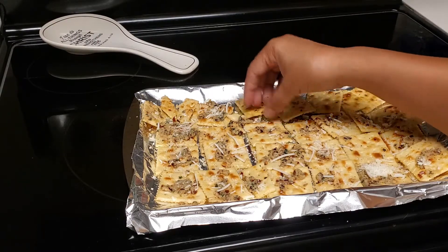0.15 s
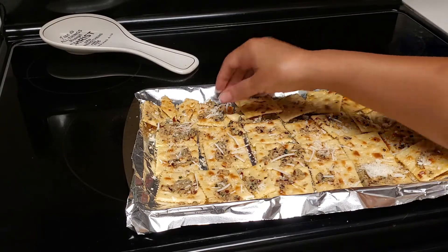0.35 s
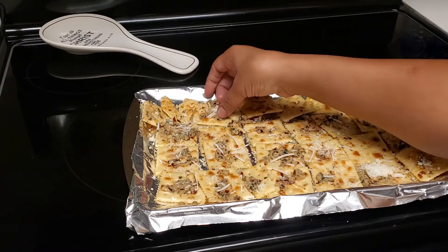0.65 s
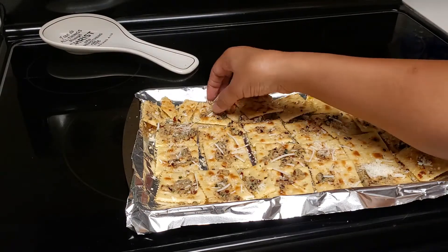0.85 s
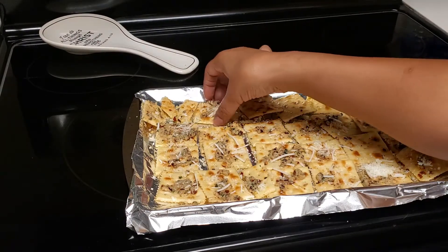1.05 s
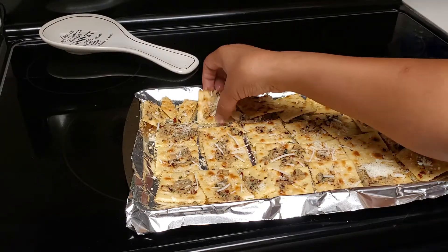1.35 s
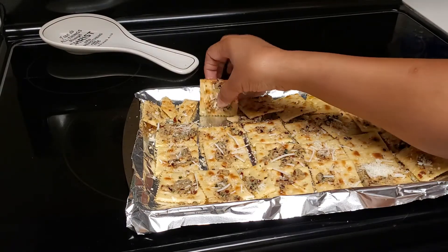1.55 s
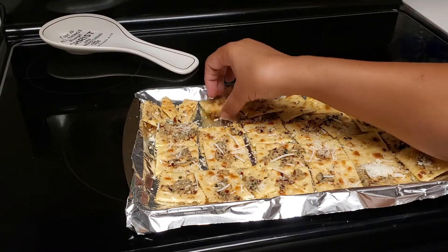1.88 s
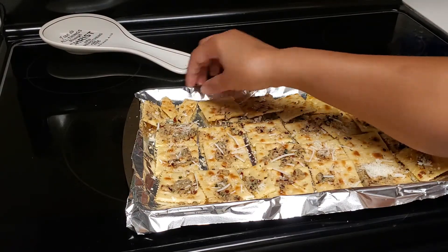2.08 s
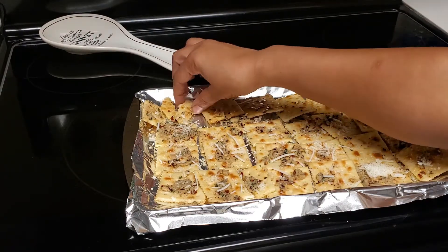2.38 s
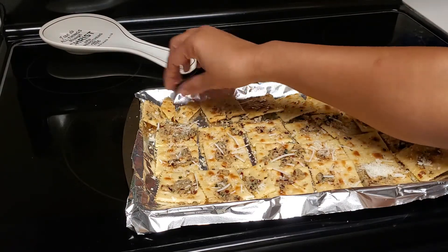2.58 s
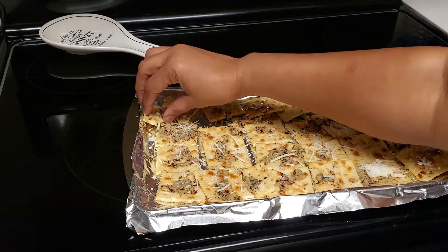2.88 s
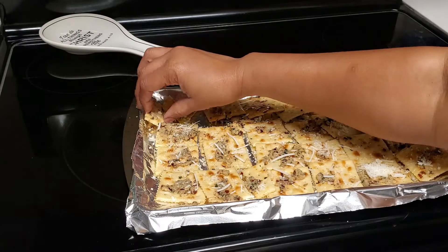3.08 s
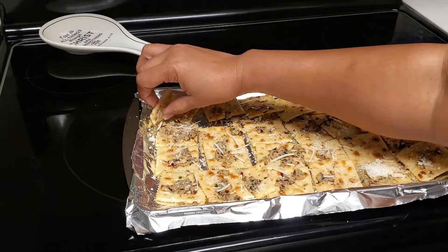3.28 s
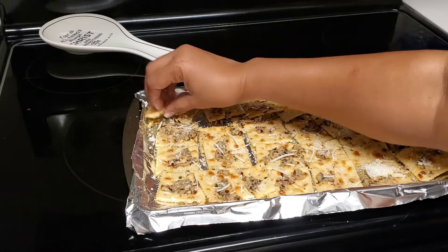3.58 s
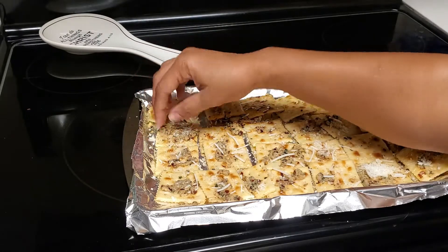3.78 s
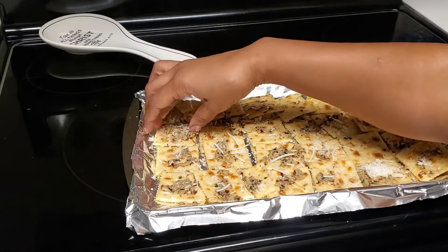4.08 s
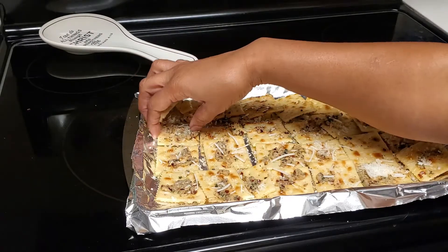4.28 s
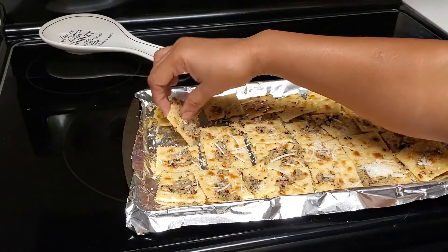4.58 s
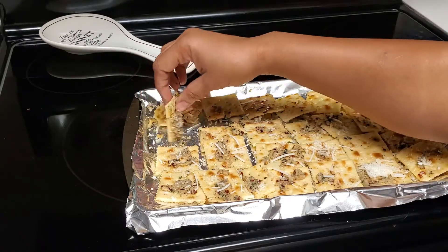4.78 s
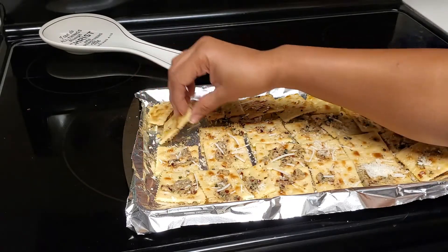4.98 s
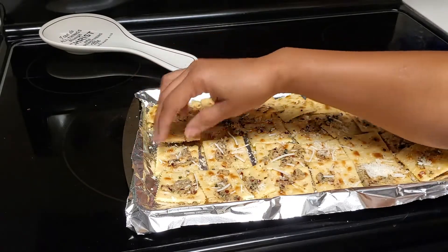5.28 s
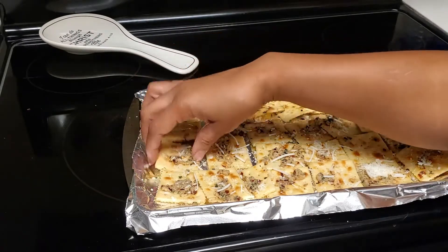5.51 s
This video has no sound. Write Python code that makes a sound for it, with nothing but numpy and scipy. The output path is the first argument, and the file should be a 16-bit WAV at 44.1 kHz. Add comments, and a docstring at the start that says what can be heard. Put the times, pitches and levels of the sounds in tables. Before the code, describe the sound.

Baked crackers are turned over on crinkling foil, with brittle snaps, light scrapes and a low, steady kitchen hum.

```python
"""An appliance hums from the start, and at once a baked cracker clicks on a foil-covered baking sheet.
A hand picks up, flips and sets down crackers: brittle edges snap and crumble, and the foil crinkles.
The sheet thuds softly as it is pressed onto the stove top, and dragged crackers scrape over the foil.
Snaps and scrapes are made of tiny cracks, and a small, hard kitchen answers them with a short echo."""
import sys
import numpy as np
from scipy import signal
from scipy.fft import rfft, irfft, next_fast_len
from scipy.io import wavfile
from scipy.ndimage import uniform_filter1d, map_coordinates

SR = 44100
rng = np.random.default_rng(int(sys.argv[2]) if len(sys.argv) > 2 else 0)


def to_wav(sig):
    """Store sig (one row per channel, or 1-D mono) as 16-bit WAV at the path in sys.argv[1].

    Samples outside -1..1 are clipped; the rate is SR.
    """
    pcm = np.clip(np.atleast_2d(sig), -1, 1) * 32767
    pcm = np.round(pcm).astype(np.int16)
    wavfile.write(sys.argv[1], SR, pcm.T)  # frames by channels


N = 249165

# how alike the background is on the left and right: f/Hz, likeness (1 = the same, 0 = unrelated)
LIKENESS = [(100, 0.94), (200, 0.93), (300, 0.97), (500, 0.24), (1000, 0), (4000, 0)]


def amp(db):
    """Turn decibels into a number to multiply by."""
    return 10 ** (np.asarray(db) / 20)


def unit(x):
    """Scale to an average strength (rms) of 1."""
    return x / np.sqrt(np.mean(x ** 2) + 1e-20)


def burst(x):
    """Scale to an average energy of 1 per channel."""
    return unit(x) / np.sqrt(x.shape[-1])


def along(points, hz):
    """Read between the rows of a (frequency, value) table, with octaves evenly spaced."""
    freqs, values = np.transpose(points)
    return np.interp(np.log(hz + 1), np.log(freqs + 1), values)


def wobble(rate):
    """A smooth curve through `rate` random values a second."""
    return map_coordinates(rng.standard_normal(int(N * rate / SR) + 4), [np.arange(N) * rate / SR])


def add(track, start_s, x):
    """Mix x into the track at the given time."""
    start = max(round(start_s * SR), 0)
    part = track[:, start:start + x.shape[1]]
    part += x[:, :part.shape[1]]


def room_noise(spectrum):
    """Steady noise that fills the room: the bass is alike on both sides, higher sounds are not."""
    size = next_fast_len(N)
    hz = np.fft.rfftfreq(size, 1 / SR)
    apart = np.arccos(along(LIKENESS, hz)) / 2
    gain = amp(along(spectrum, hz)) * [np.cos(apart), np.sin(apart)]
    mid, side = irfft(rfft(rng.standard_normal((2, N)), size) * gain, size)[:, :N]
    return unit(np.array([mid + side, mid - side]))


def appliance(air_db=-57.5, hiss_db=-78, waver_db=2, drift_rad=1.01):
    """A motor and the mains hum in wavering tones over a rush of moving air and a faint hiss."""
    # motor and mains tones: f/Hz, wavering rate/Hz, level/dB
    hum_tones = [(54.9, 0.54, -70), (60.1, 0.28, -72), (83.9, 3, -76), (119.6, 3, -72), (153.8, 8, -70),
                 (214.2, 2.8, -62), (235.8, 12, -64), (335.4, 9, -69.5), (422.2, 5, -70.5),
                 (566.4, 12, -70), (630, 8, -73), (2840, 89, -83.5)]
    # air moved by the appliance: f/Hz, relative level/dB
    air_colour = [(22, -29), (40, -8), (70, -3), (130, -6.5), (190, -2.5), (260, -1), (380, -3.5),
                  (480, -6), (620, -8), (800, -9), (1100, -20.5), (1600, -29), (2500, -50), (5000, -39)]
    # the faint hiss: f/Hz, relative level/dB
    hiss_colour = [(500, -12.5), (1200, -10), (2000, -1), (2400, -16.5), (2900, -29), (3500, -5),
                   (4400, -26), (5400, 1.5), (7000, -14), (9000, -15.5), (11000, -27.5), (16000, -17)]
    t = np.arange(N) / SR
    hum = np.zeros((2, N))
    for hz, waver_hz, db in hum_tones:
        phase = 2 * np.pi * hz * t + drift_rad * wobble(2 * waver_hz)
        apart = np.arccos(along(LIKENESS, hz)) / 2  # standing waves differ between left and right
        loudness = amp(db + waver_db * wobble(waver_hz))
        hum += loudness * np.sqrt(2) * np.sin([phase + apart, phase - apart])
    air = amp(air_db) * room_noise(air_colour)
    hiss = amp(hiss_db) * room_noise(hiss_colour)
    return hum + air + hiss


def fractures(length_s, per_second, spread_db, swell_s, count=128):
    """One spike for each tiny break, uneven in size and spacing; the run builds up and lets go."""
    times = (np.arange(count) + rng.random(count)) / per_second
    sizes = amp(spread_db * rng.standard_normal(count).clip(-2, 1.5)) * rng.choice([-1, 1], count)
    times[0] = min(times[0], length_s / 2)  # even the shortest run has one break
    sizes *= np.minimum(np.minimum(times, length_s - times) / swell_s, 1)
    within = times <= length_s
    return burst(np.bincount((times[within] * SR).astype(int), sizes[within], int(length_s * SR) + 1))


def crack(crush, click_s=0.00029, scatter_s=0.0039, grain_db=4, size=1536, lag_samples=4):
    """A brittle click that reaches the left side first, then a grainy tail; more crush draws it out."""
    t = np.arange(size) / SR
    click = burst(rng.standard_normal(size) * np.exp(-t / (click_s * crush)))
    click_pair = np.array([click, np.pad(click, (lag_samples, 0))[:size]])
    grains = amp(grain_db * unit(uniform_filter1d(rng.standard_normal(size), size=24)))
    rise_and_fall = np.exp(-t / (scatter_s * crush)) * (1 - np.exp(-t / click_s))
    scatter = burst(rng.standard_normal((2, size)) * grains * rise_and_fall)
    click_share = np.clip(0.22 / crush, 0, 0.8)
    return np.sqrt(click_share) * click_pair + np.sqrt(1 - click_share) * scatter


def kitchen_echo(build_s=0.0023):
    """The small, hard room answers with a wash of noise in which the bass lasts longest."""
    # how long the room rings: f/Hz, time to fade by 60 dB/s
    fade_times = [(300, 0.71), (1000, 0.27), (2500, 0.31), (5500, 0.28), (10000, 0.28), (15000, 0.22)]
    hz, t, bands = signal.stft(rng.standard_normal((2, SR // 2)), SR, nperseg=256)
    fade = amp(-60 * t / along(fade_times, hz)[:, None])
    tail = signal.istft(bands * fade, SR, nperseg=256)[1]
    rise = 1 - np.exp(-np.arange(tail.shape[1]) / SR / build_s)
    return burst(tail * rise)


def crack_in_room(crack_db, pan_db, crush):
    """One break as it arrives: the crack itself, thinner the smaller it is, then the echo."""
    low_cut_hz = np.clip(2400 / crush ** 2, 100, SR / 4)
    direct = burst(signal.lfilter(*signal.butter(1, low_cut_hz, "high", fs=SR), crack(crush)))
    sound = kitchen_echo()
    add(sound, 0, direct * amp([[crack_db + pan_db / 2], [crack_db - pan_db / 2]]))
    return sound


def ringing(hz, low_hz=2400, high_hz=15000, width=0.08, ring_db=6.0, count=8):
    """Each piece of cracker or patch of foil rings at a few pitches of its own."""
    centres = low_hz * (high_hz / low_hz) ** rng.random((count, 1))
    peaks = rng.uniform(0.4, 1, (count, 1)) / (1 + ((hz - centres) / (width * centres / 2)) ** 2)
    return unit(amp(ring_db * peaks.max(0)))


def cracker_tone(x, body_db, treble_db, low_cut_hz=220, size=2048):
    """Give x the tone of a cracker on foil, heavier or brighter from one touch to the next."""
    # tone of a dry cracker on foil: f/Hz, relative level/dB
    crisp_colour = [(300, -5.5), (700, -11.5), (1100, -11.5), (1600, -9.5), (2300, -6), (3100, -1),
                    (4000, -0.5), (5300, -2), (6500, -3), (7800, -6.5), (9500, -3), (12000, -7.5),
                    (15300, -3)]
    hz = np.fft.rfftfreq(size, 1 / SR)
    tilt = [(1800, body_db), (3100, 0), (5400, 0.0066), (9000, treble_db), (15500, 0.76 * treble_db)]
    low_cut = hz ** 2 / (hz ** 2 + low_cut_hz ** 2)
    gain = unit(amp(along(crisp_colour, hz))) * ringing(hz) * amp(along(tilt, hz)) * low_cut
    # build a filter that rings only after each click, never before it
    cepstrum = irfft(np.log(gain + 1e-3))
    cepstrum[1:size // 2] *= 2
    cepstrum[size // 2 + 1:] = 0
    response = irfft(np.exp(rfft(cepstrum)))
    return signal.fftconvolve(x, response[None], axes=1)


def snaps(half_clean_s=0.01, sharp_db=1, crumbly_db=-4.5, clean_crush=0.7, crumbly_crush=2.06):
    """Cracker edges chip and foil creases pop; what does not break at once crumbles around the snap."""
    # light foil ticks and heavier cracker edges: t/s, level/dB, crumbling time/s, body/dB, treble/dB
    touches = [(0.001, -7, 0.01, 1, -1.5), (0.1, -21, 0.00083, 6.5, -0.5), (0.384, -0.5, 0.027, 2, -1.5),
               (0.406, -9, .002, 6, 1.5), (0.532, -1.5, .013, 1.5, 1), (0.641, -4, 0.021, 2, -1.5),
               (0.726, -2, 0.029, 0.5, -5), (0.757, -2, 0.0032, 3, 1.5), (0.881, -6.5, 0.0036, 2.5, 0),
               (0.96, -19, 0.0012, 1, -1), (1.005, -22, .003, -14, 7), (1.123, -10.5, 0.00056, -12, -5),
               (1.133, -12, 0.013, 0.5, 0), (1.226, -14, 0.00056, 3.5, 4.5), (1.284, -5.5, .009, 2.5, 2),
               (1.582, -21.5, 0.0057, -2, -9), (1.622, -24.5, 0.0021, -2, 1.5), (1.733, -4, 0.023, 0, 0),
               (1.76, -7, 0.00054, -6, -1), (1.927, -24.5, 0.0013, -7, -5), (2.198, -7.5, 0.0079, 0.5, 2),
               (2.273, -8.5, 0.0011, 1.5, -2), (2.285, -16, 0.0021, 4.5, 5.5),
               (2.559, -17.5, .003, 0, -2.5), (2.831, -23.5, 0.0036, 4, 0.5),
               (2.888, -19.5, 0.037, 11.5, 5), (3.192, -16, 0.028, 8, 3), (3.233, -12.5, 0.018, 8.5, -2),
               (3.594, -10.5, .034, 6.5, 2), (3.634, -13.5, 0.011, 5.5, -5), (3.979, -33.5, 0.0063, 2, 5.5),
               (4.079, -31, .012, -15, 11), (4.266, -21.5, 0.00028, 2, 10.5), (4.533, -14.5, 0.01, -4, -9),
               (4.549, -8, 0.0044, 0.5, 3.5), (4.767, -35, 0.0037, 10, -7), (5.088, -25, 0.0021, 16, -6.5),
               (5.357, -23.5, .008, 8.5, -4), (5.382, -18, 0.0014, 7.5, 0.5), (5.419, -21, 0.0021, -1, 7.5),
               (5.452, -18.5, 0.0079, 5, 1.5), (5.593, -20, 0.0061, 5, -1)]
    out = np.zeros((2, N))
    for start_s, db, crumble_s, body_db, treble_db in touches:
        clean = 1 / (1 + crumble_s / half_clean_s)  # the main snap's share of the energy
        crush = crumbly_crush + clean * (clean_crush - crumbly_crush)
        # clean snaps stand out from the echo, and bright ticks beam straight at the listener
        crack_db = crumbly_db + clean * (sharp_db - crumbly_db) + 0.2 * treble_db
        # left minus right: bright ticks lie further right, and all drift right as the hand moves
        pan_db = 3 - 0.27 * treble_db - start_s
        crumbs = np.sqrt(1 - clean) * fractures(crumble_s, per_second=700, spread_db=5.5, swell_s=0.0011)
        sound = signal.fftconvolve(crumbs[None], crack_in_room(crack_db, pan_db, crush=0.94), axes=1)
        main_snap = np.sqrt(clean) * crack_in_room(crack_db, pan_db, crush)
        add(sound, 0.2 * crumble_s, main_snap)  # a fifth of the way into the crumbling
        add(out, start_s, amp(db) * cracker_tone(sound, body_db, treble_db))
    return out


def thuds(fade_s=0.38, attack_s=0.0011, overtone_ratio=3.0, overtone_db=-7):
    """The loaded sheet bumps the stove top with a soft, low note that soon dies away."""
    # the hand presses the sheet down: t/s, level/dB, f/Hz
    presses = [(0.386, -50.5, 145.6), (0.756, -65, 165), (2.199, -52, 125), (2.385, -53, 62.7),
               (4.551, -52, 148.8), (5.087, -50, 159.2), (5.124, -50, 105.7), (5.14, -52.5, 137.4)]
    out = np.zeros((2, N))
    t = np.arange(SR // 2) / SR
    for start_s, db, hz in presses:
        phase = 2 * np.pi * hz * t
        ring = np.sin(phase) + amp(overtone_db) * np.sin(overtone_ratio * phase)
        loudness = amp(db - 60 * t / fade_s) * (1 - np.exp(-t / attack_s))
        add(out, start_s, (loudness * ring)[None])
    return out


def scrapes(breaks_per_s=140, corners=2):
    """Dragging a cracker sets off tiny breaks at each corner that touches the foil."""
    # drags over the foil: start/s, end/s, level/dB, body/dB, treble/dB
    drags = [(0.922, 1.095, -56.5, 1, -6.5), (1.3, 1.42, -57, 3, -5), (1.449, 1.726, -66, 1, -7),
             (1.79, 1.855, -47, 6, -5.5), (2.215, 2.275, -48, 10, -5), (2.329, 2.49, -67.5, -10, 1.5),
             (2.876, 2.965, -54.5, 0, -3.5), (3.042, 3.21, -67, 6, 2), (3.33, 3.41, -60, 7, -3.5),
             (3.517, 3.61, -64, -13, 5.5), (3.827, 4.057, -72.5, -1, 1.5), (4.07, 4.237, -68.5, -18, 7.5),
             (4.358, 4.527, -60.5, -13, -1), (4.876, 5.05, -72, 3, 4), (5.361, 5.571, -59.5, 6, -7.5)]
    out = np.zeros((2, N))
    for start_s, end_s, db, body_db, treble_db in drags:
        for _ in range(corners):
            breaks = fractures(end_s - start_s, breaks_per_s / corners, spread_db=7.0, swell_s=0.0058)
            slips = unit(breaks) / np.sqrt(corners)
            one_crack = crack_in_room(crack_db=0, pan_db=0, crush=0.73)
            sound = signal.fftconvolve(slips[None], one_crack, axes=1)
            add(out, start_s, amp(db) * cracker_tone(sound, body_db, treble_db))
    return out


def microphone_sides(x):
    """Each side of the microphone favours its own ranges of pitch."""
    # how the sheet's sound leans to one side: f/Hz, left minus right/dB
    balance = [(300, -3.5), (1000, 2), (2000, 1.1), (4000, 2.7), (8000, -0.5), (13000, 0.5)]
    size = next_fast_len(N + SR // 2)
    lean_db = along(balance, np.fft.rfftfreq(size, 1 / SR)) / 2
    return irfft(rfft(x, size) * amp([lean_db, -lean_db]), size)[:, :N]


def scene():
    """The hand's work on the baking sheet over the hum of the kitchen."""
    return microphone_sides(snaps() + scrapes()) + thuds() + appliance()


def record(dry, top_hz=15900):
    """Cut away the very highest treble."""
    size = next_fast_len(N + SR // 2)
    hz = np.fft.rfftfreq(size, 1 / SR)
    return irfft(rfft(dry, size) / np.sqrt(1 + (hz / top_hz) ** 200), size)[:, :N]


dry = scene()
out = record(dry)
to_wav(out)
```